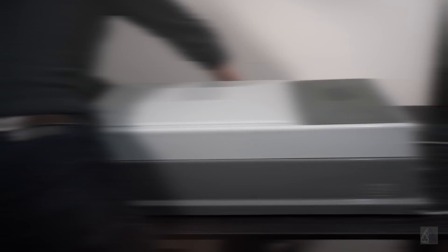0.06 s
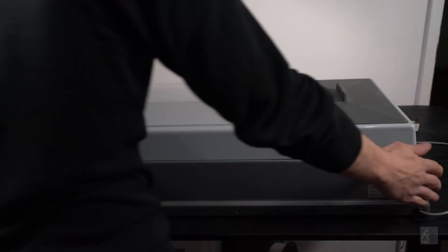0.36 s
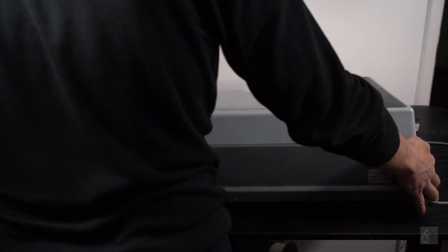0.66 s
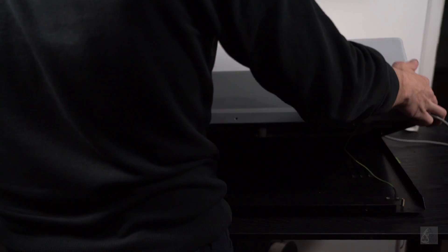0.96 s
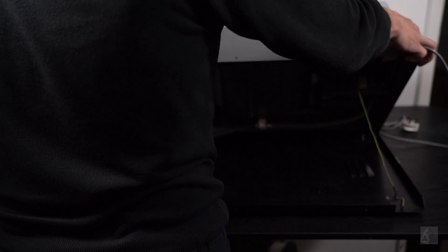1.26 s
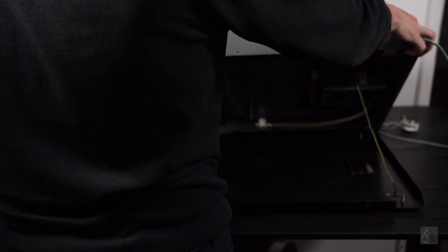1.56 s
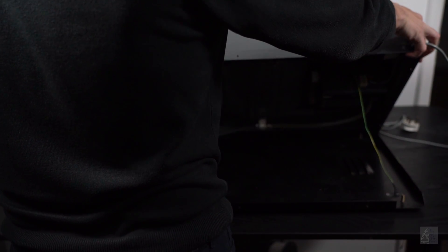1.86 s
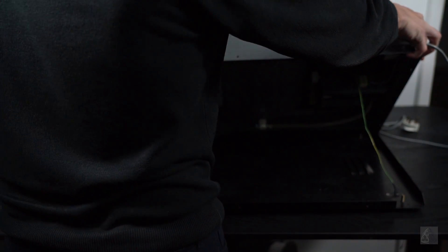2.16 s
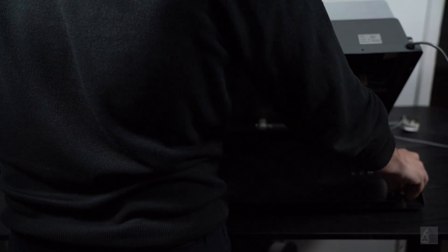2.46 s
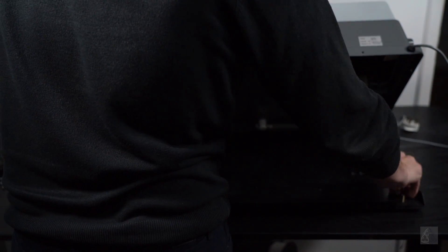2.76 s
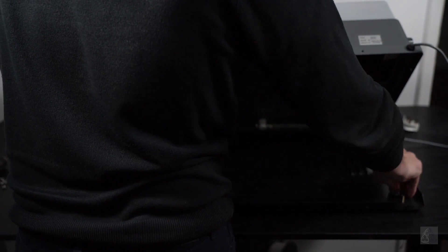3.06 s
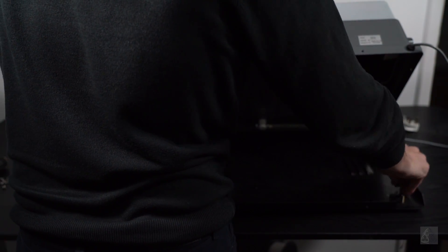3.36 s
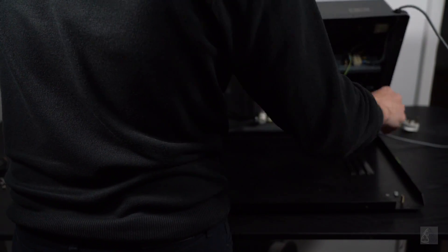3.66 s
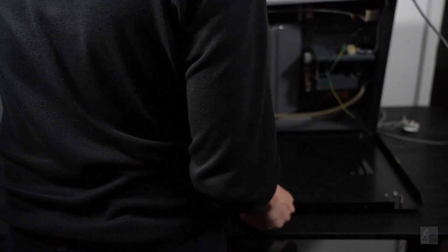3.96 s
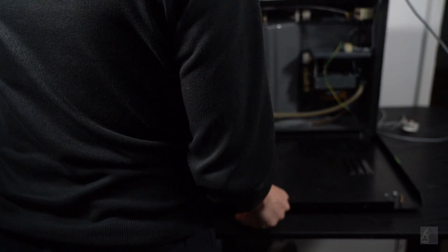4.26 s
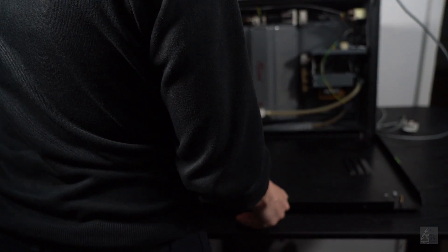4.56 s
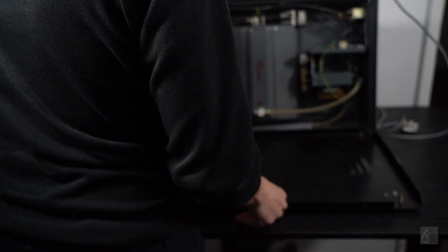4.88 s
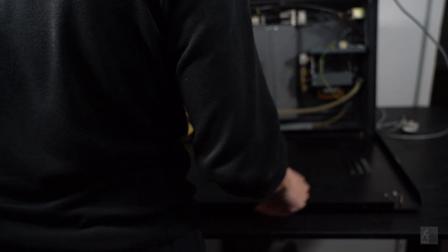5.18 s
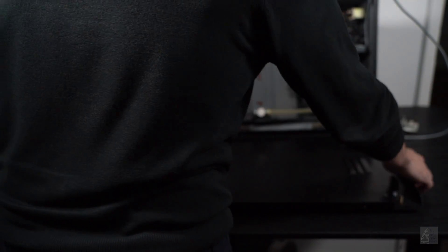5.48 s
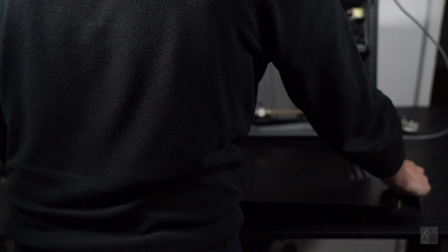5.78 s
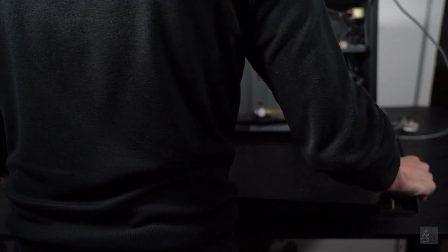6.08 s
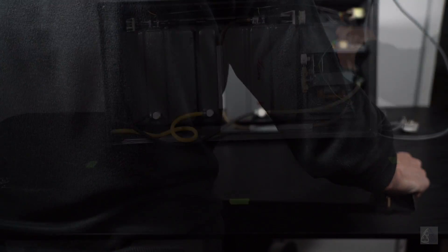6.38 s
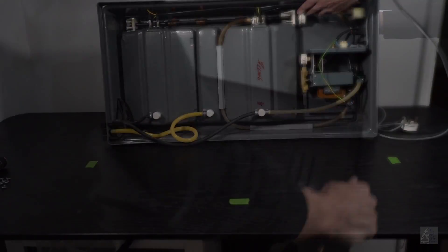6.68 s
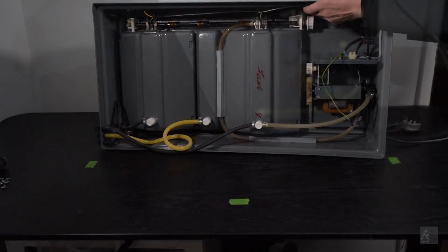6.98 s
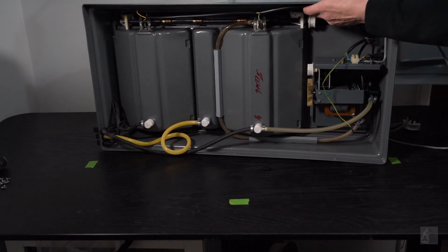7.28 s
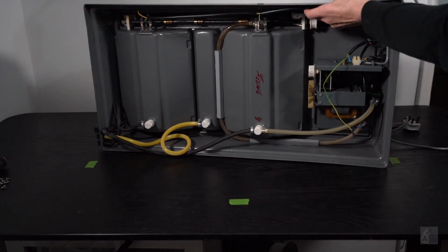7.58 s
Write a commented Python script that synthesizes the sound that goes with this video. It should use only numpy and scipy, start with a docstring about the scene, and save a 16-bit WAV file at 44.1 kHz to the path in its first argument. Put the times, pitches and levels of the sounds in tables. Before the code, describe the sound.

Hands and sleeves brush a machine's plastic housing, which gives a few hollow knocks and light clicks as it is lifted. About halfway through, it clatters loudly and judders briefly on its loose base panel. Softer knocks and rubs follow, then a second quick cluster of loud knocks as it rocks to rest on a table. It is heard in stereo in a small room with faint hiss.

```python
"""Over a faint room tone, hands and sleeves brush a machine's plastic housing; then it knocks and flexes
as it is lifted and stood on edge on a table. It clatters and judders on its loose base panel, a fitting
snaps, and it rocks to rest. Blows excite the damped modes of the shell, sliding friction drives its crowded
resonances as noise, and flexed parts ring when let go. A microphone pair hears it in a small room."""
import sys
import numpy as np
from scipy import signal
from scipy.fft import rfft, irfft, next_fast_len
from scipy.io import wavfile
from scipy.ndimage import uniform_filter1d

SR = 44100
rng = np.random.default_rng(int(sys.argv[2]) if len(sys.argv) > 2 else 0)


def file_out(sig):
    """Save sig as 16-bit WAV at sys.argv[1]."""
    # one column per channel
    cols = np.atleast_2d(sig).T
    # limit, then scale
    lim = np.clip(cols, -1, 1)
    pcm = np.round(lim * 32767).astype(np.int16)
    wavfile.write(sys.argv[1], SR, pcm)


N = 340893

# room murmur and hiss: (frequency [Hz], relative spectral density [dB])
ROOM_SPECTRUM = [(15, -51), (25, -6), (204, 2.5), (260, -3.5), (445, -3.5), (523, -3), (631, -7), (997, -8),
                 (1380, -10), (2630, -13), (9550, -18), (14300, -19.5), (15500, -18.5)]
# likeness of the two channels: (frequency [Hz], correlation [ratio])
COHERENCE = [(60, .99), (300, .96), (600, .87), (900, .68), (1400, .42), (2800, .1), (10000, .12)]
# stereo balance: (frequency [Hz], left minus right [dB])
BALANCE = [(250, 0.06), (1000, 1.5), (2000, 0.3), (4000, 1), (8000, -1.7), (12000, 0)]
# main modes of the housing and its panel: (frequency [Hz], relative level [dB], t60 [s])
SHELL_MODES = [(128, -13, .3), (180, -10, .14), (227, -6, .16), (302, -6, .2), (366, -8, .14),
               (431, -7, .16), (515, -6, .13), (560, -7, .12), (943, -6, .16), (1008, -9, .12),
               (1207, -8, .17), (1435, -10, .13), (1519, -5, .18), (1731, -8, .14), (1816, -6, .18),
               (2036, -10, .15), (2148, -9, .15), (2242, -8, .16), (2352, -10, .15), (2546, -10, .12),
               (3250, -13, .09), (4414, -14, .1), (4678, -12, .1), (9700, -13, .05)]
# decay of the shell's dense, overlapping modes: (frequency [Hz], base t60 [s])
SHELL_DECAY = [(90, 0.25), (230, 0.08), (700, 0.09), (2100, 0.094), (7500, 0.065)]
# the hold tightens and loosens, changing that decay: (time [s], t60 multiplier [ratio])
GRIP_RING_LENGTH = [(.6, 1.2), (4.15, 1.4), (4.35, 1.25), (4.44, .9), (4.53, 1.4), (4.73, .9), (5.5, 1.3),
                    (6.82, 1.05), (6.89, 1.5)]
# centres of the table thump, shell boom, knock, crack, tick and sizzle zones: (frequency [Hz])
ZONES_HZ = [90, 230, 700, 2100, 5500, 12000]
# spectral weighting added to every contact: (frequency [Hz], gain [dB])
CONTACT_COLOUR = [(25, -25.5), (50, -8), (100, -7), (150, 3), (230, -1), (420, -1), (800, -2), (1300, 0),
                  (2000, -1), (3200, -1), (5000, -2), (7200, 0.5), (9500, 8), (16000, -11.5)]
# hands, sleeves and edges sliding; boom and crack are relative to the drive in the knock zone:
# (time [s], duration [s], drive [dB], boom [dB], crack [dB], tilt above the crack [dB/octave])
RUBS = [(0.06, 0.044, -50, -6, -0.5, 6.5), (0.072, .11, -56.5, -9, -0.5, 4.5),
        (0.201, 0.23, -63.5, -12, 4.5, -3), (0.339, 0.09, -51, -10, -5.5, -8.5),
        (0.432, 0.15, -49, -6, -3, -5.5), (0.638, 0.074, -53.5, 12, -15, -1),
        (1.301, 0.1, -58.5, 6, 0.5, -3), (1.391, 0.1, -46.5, 6, -9, -4), (1.49, 0.079, -48, 4.5, 5.5, -8.5),
        (3.973, .075, -51.5, 8, -3.5, -3.5), (4.111, 0.14, -38, 0, 4, -6.5),
        (4.468, 0.042, -43, -5, -15, -6), (4.602, 0.1, -58.5, 2, -12, -10.5),
        (5.395, .14, -64, -10, 14.5, -8), (5.595, 0.082, -54, 0, 3, -3.5), (5.691, 0.12, -57, -2, -1.5, -7),
        (6.074, 0.2, -64.5, 12, 4.5, -4.5), (6.716, 0.091, -43.5, -1, -6, -4),
        (6.969, 0.13, -52, -7, 0, -6.5), (7.39, 0.092, -52.5, 1, -3, -11),
        (7.654, 0.054, -60, -12, 3.5, -2.5)]
# walls springing back and parts left ringing: (time [s], frequency [Hz], level [dB], t60 [s])
FREE_RINGS = [(.876, 2730, -24.5, 0.026), (.876, 2133, -26.5, .04), (.877, 3500, -34, 0.033),
              (.878, 1103, -25.5, .074), (.880, 207, -0.5, 0.064), (1.439, 556, -20.5, 0.044),
              (1.469, 77, -30, 0.12), (1.965, 207, -40.5, 0.15), (2.282, 2620, -43, 0.035),
              (2.286, 365, -43, 0.08), (3.895, 1208, -45.5, 0.23), (3.894, 1820, -49, 0.2),
              (3.893, 2147, -41.5, .092), (4.156, 544, -23, 0.24), (4.158, 221.7, -16.5, 0.32),
              (4.26, 1754, -19.5, 0.11), (4.281, 302, -25.5, 0.13), (4.331, 1006, -23.5, 0.24),
              (4.4, 2095, -32, .18), (4.537, 428.6, -24.5, 0.19), (4.539, 248, -19, 0.092),
              (5.815, 3550, -39.5, .045), (6.771, 570, -13.5, 0.031), (7.155, 953, -47, .21)]
# impacts on the housing; thump, boom and crack are relative to the drive in the knock zone:
# (time [s], build-up [s], drive [dB], thump [dB], boom [dB], crack [dB], tilt above the crack [dB/octave])
BLOWS = [ (0.204, 0.00087, -52.5, -25, -7, -7.5, -1.5), (0.551, 0.0011, -42.5, -4, -8, -8.5, -6.5),
         (0.621, 0.0069, -31.5, -17, 0, -7.5, -6), (0.875, 0.0032, -30.5, -4, 7.5, 0.5, -12),
         (0.935, 0.0032, -40.5, -24, 10.5, -11, -14), (1.005, 0.0011, -51, -11, 12.5, 0.5, -13),
         (1.151, 0.003, -60, -3, 13.5, -7, -3), (1.184, 0.0067, -62, 5, 14, 5.5, -2),
         (1.268, 0.01, -42, -12, 4.5, -5.5, -5), (1.435, 0.0018, -41, -9, 6.5, -1, -28),
         (1.57, 0.0079, -45, -6, 0, -5.5, -1.5), (1.668, 0.014, -51.5, -18, 0, -4, 4),
         (1.764, 0.004, -43.5, -20, 1.5, -5.5, -6), (1.84, 0.012, -46, -26, 4.5, -18, 0),
         (1.960, 0.014, -47.5, -16, -4, -5.5, -3), (2.164, 0.0091, -50.5, -6, -1.5, -2.5, -4.7),
         (2.277, 0.0032, -49, -12, 12.5, 3, -10), (2.451, 0.0092, -44, 5, 7.5, -10, -2.5),
         (2.493, .003, -55.5, -11, -5, 0, -5.5), (2.578, 0.0028, -68, 2, -5, 7, -2.5),
         (2.698, 0.0022, -58.5, -9, 10.5, -0.5, -13), (2.896, .003, -55, -11, -4, -9, -13),
         (2.936, 0.011, -51.5, -9, 4, 0, -3.5), (3.117, 0.0045, -62, 5, 12, 4.5, -3),
         (3.383, 0.0083, -45, 6.5, 1.5, 1.5, -2), (3.669, 0.0066, -47, -8, 0.5, -9, -11),
         (3.742, 0.0096, -50, -8, 3, -7, 0), (3.889, 0.0077, -51, 1, -3, 7, -13),
         (4.043, .012, -42.5, 15, 12.5, -7, -13), (4.060, 0.0029, -33, -14, 13.5, -12, -4.5),
         (4.122, 0.0067, -25, -17.5, 1, -14, -13), (4.149, .003, -15, -16, -8, -9.5, -2),
         (4.167, 0.0011, -28, -23, 17.5, 2, -6), (4.185, 0.0013, -22.5, -16, -5, 0, -9),
         (4.213, .001, -30, -40, 1.5, 1.5, -5.5), (4.227, 0.0017, -25, -38, -12, 8, -4),
         (4.326, 0.0059, -22.5, -18, -6.5, 7, -6.5), (4.356, .0026, -32, -32.5, -15, 0.5, -3.5),
         (4.403, .001, -31.5, -24, -18, 3, -9.5), (4.432, 0.0035, -29.5, -27, -17, 3.5, -13),
         (4.519, 0.006, -45, -10.5, -19, 5, -9), (4.534, 0.0027, -15.5, -22, -5.5, -13, -9),
         (4.732, 0.0012, -35, 1, 7.5, -2.5, -4), (4.761, 0.0007, -25.5, -15, -1, -12.5, -14),
         (5.023, .001, -72, -7, -8, 6, 1), (5.146, 0.0054, -60.5, -8, 0, 8.5, -13),
         (5.444, 0.0072, -47.5, -6, 3, 0, -7), (5.592, .005, -50, -18, 5.5, -2.5, -4.5),
         (5.664, 0.0046, -44.5, -8, 7.5, -14, -9), (5.742, 0.002, -37, -9.5, -2, -14, -7.5),
         (5.814, 0.002, -37.5, -11, 9.5, -2.5, -16.5), (5.949, 0.0026, -36, -1.5, -0.5, 6, -0.5),
         (6.079, 0.0035, -42.5, -34, 2.5, -14.5, -3.5), (6.140, 0.0055, -50, -10, 6, 0, -21),
         (6.255, 0.0018, -46, 2.5, 2.5, -14, -10), (6.354, 0.0073, -60, 12, 8.5, -2.5, -8),
         (6.559, 0.0057, -58.5, -17, -23, 5.5, -6), (6.769, 0.0078, -29.5, -12, 9, -10, -1.5),
         (6.809, 0.0018, -21, -11, -.5, -12.5, -12.5), (6.839, 0.009, -19, -29, 2.5, -9, -4.5),
         (6.881, 0.0025, -21, -36, 1.5, -0.5, -13.5), (6.893, 0.0083, -21.5, -10, 4.5, -3, -11.5),
         (6.932, 0.0058, -37, -19, 17, -8, -5.5), (7.05, 0.0011, -51, -1, 6, -0.5, -7),
         (7.152, 0.026, -43.5, -14, 13.5, -4, -13), (7.191, .003, -47.5, -18, -11, 1, -17),
         (7.567, 0.0065, -57.5, -6, 7.5, -0.5, -3), (7.687, 0.0011, -46.5, -18, -11, 2.5, -12.5)]

BANDS_HZ = 31.25 * 2 ** (np.arange(19) / 2)
TOP_HZ = 15850
RING_SAMPLES, NOISE_SAMPLES = 12000, 65536
T = np.arange(RING_SAMPLES) / SR  # time since a contact, s


def undb(db):
    """Amplitude grows tenfold for every 20 dB."""
    return 10 ** (np.asarray(db) / 20)


def at(hz, points):
    """Interpolation of (frequency, value) points on a logarithmic frequency axis."""
    f, value = np.transpose(points)
    return np.interp(np.log(np.maximum(hz, 1)), np.log(f), value)


def add(out, s, sound):
    """Superposition: a sound starting at time s adds to those already present."""
    i = max(int(s * SR), 0)
    out[:, i:i + sound.shape[1]] += sound[:, :max(N - i, 0)]


def stereo(hz, mid, side):
    """Spatial coherence: the channels agree in the bass and part in the treble, where reflections dominate."""
    alike = np.clip(at(hz, COHERENCE), 0, 1)
    lean = undb(at(hz, BALANCE) / 2)
    mid, side = mid * np.sqrt((1 + alike) / 2), side * np.sqrt((1 - alike) / 2)
    return np.array([(mid + side) * lean, (mid - side) / lean])


def room_tone(level_db=-61.52):
    """Stationary noise: a low room murmur under even microphone hiss."""
    size = next_fast_len(N)
    hz = np.fft.rfftfreq(size, 1 / SR)
    white = stereo(hz, *rfft(rng.standard_normal((2, size))))
    noise = irfft(white * undb(at(hz, ROOM_SPECTRUM)) * (hz < TOP_HZ), size)[:, :N]
    return noise / np.std(noise.mean(axis=0)) * undb(level_db)


def dense_modes(peak_db=12, half_width_hz=16):
    """Modal overlap: crowded resonances act as noise, peaked at the main modes; (band, channel, time)."""
    hz = np.maximum(np.fft.rfftfreq(NOISE_SAMPLES, 1 / SR), 1)
    resonances = (undb(peak_db + db) / (1 + ((hz - f) / half_width_hz) ** 2) for f, db, _ in SHELL_MODES)
    peaks = np.sqrt(1 + sum(resonance ** 2 for resonance in resonances))
    bands = []
    for centre in BANDS_HZ:
        spectrum = stereo(hz, *rfft(rng.standard_normal((2, NOISE_SAMPLES)))) * peaks
        window = np.cos(np.pi / 2 * np.clip(2 * np.log2(hz / centre), -1, 1))
        band = irfft(spectrum * window, NOISE_SAMPLES)
        bands.append(band / np.std(band))
    return np.array(bands, dtype=np.float32)


def stretch(bands, count):
    """Random phase: each contact takes its own stretch of the crowded resonances."""
    start = int(rng.random() * (NOISE_SAMPLES // 2))
    return bands[:, :, start:start + count]


def treble(crack_db, tilt_db):
    """Contact hardness sets the slope per octave: crack, tick and sizzle in dB, duller when soft."""
    octaves = np.log2(np.array(ZONES_HZ[3:]) / ZONES_HZ[3])
    return crack_db + tilt_db * octaves + np.array([-0.5, -0.5, -4.5])  # thin plastic loses the very top


def excitation(hz, db, thump, boom, crack, tick, sizzle):
    """Excitation spectrum: how strongly a contact drives half an octave around each frequency."""
    zone_db = np.interp(np.log(hz), np.log(ZONES_HZ), [thump, boom, 0, crack, tick, sizzle])
    return undb(db + zone_db + at(hz, CONTACT_COLOUR)) / np.sqrt(2)


def chatter(count, spread_db, step=24):
    """Uneven contact: the force, of unit rms, jumps at random every step samples."""
    force = np.repeat(undb(spread_db * rng.standard_normal(count // step + 1)), step)[:count]
    return force / np.sqrt(np.mean(force ** 2))


def mix(shell, gain, grain):
    """Amplitude modulation: the bands are summed, and the contact's grain roughens only the treble."""
    bright = BANDS_HZ > 900
    low, high = (np.einsum("b,bct->ct", np.float32(gain * part), shell) for part in (~bright, bright))
    return low + high * grain


def finger_taps(count=48, per_s=4, build_s=0.00484, drive_db=-73, thump_db=-11.5, boom_db=13.5):
    """Light impacts: contacts of shifting fingers, random in time, strength and hardness."""
    starts = (np.arange(count) + rng.random(count)) / per_s
    return [(s, build_s, drive_db - 1.5 * weak, thump_db, boom_db, *treble(crack_db=6, tilt_db=hard - 0.5))
            for s, (weak, hard) in zip(starts, rng.standard_normal((count, 2))) if s < N / SR]


def rubs(bands, grain_db=3, catch_db=1.7, gain_db=-2.0):
    """Sliding friction: the pressure swells, catches and fades, driving the shell with a fine grain."""
    out = np.zeros((2, N))
    for s, length, db, boom, crack, tilt in RUBS:
        thump = boom - 8  # sliding shakes the table less than the shell
        gain = excitation(BANDS_HZ, db, thump, boom, *treble(crack, tilt))
        count = int(length * SR)
        catches = uniform_filter1d(chatter(NOISE_SAMPLES, catch_db, step=500), size=200)[:count]
        pressure = np.sqrt(np.sin(np.pi * np.arange(count) / count)) * catches
        add(out, s, pressure * mix(stretch(bands, count), gain, chatter(NOISE_SAMPLES, grain_db)[:count]))
    return undb(gain_db) * out


def flexed_parts():
    """Free vibration: a flexed part lets go and rings at one frequency, decaying exponentially."""
    out = np.zeros((2, N))
    for s, hz, db, t60 in FREE_RINGS:
        swell_s = 0.00037 + 1 / hz  # a moment plus one cycle
        envelope = undb(db - 60 * T / t60) * (1 - np.exp(-(T / swell_s) ** 2))
        ring = envelope * np.exp(2j * np.pi * hz * T)
        add(out, s, stereo(hz, ring, 1j * ring).imag)
    return out


def judder(count=12, start_s=4.243, slips_per_s=56, build_s=0.0014, surge_s=0.098, surge_db=2):
    """Stick-slip on the base panel: uneven, surging contacts, weaker and duller as the sliding slows."""
    late, strong = rng.standard_normal((count, 2)).T
    ages = (np.arange(count) + 0.16 * late) / slips_per_s
    surge = surge_db * np.cos(2 * np.pi * ages / surge_s)
    drives_db = -28 - 29 * ages + surge + strong
    sizzles_db = -22.5 - 101 * ages
    thump_db, boom_db, crack_db, tick_db = -15.5, -9.5, 0.5, 2.5  # the panel's edge is bright
    return [(start_s + age, build_s, db, thump_db, boom_db, crack_db, tick_db, sizzle_db)
            for age, db, sizzle_db in zip(ages, drives_db, sizzles_db)]


def handling():
    """Impulsive forcing: the contacts of gripping, lifting and setting down."""
    return [(*blow, *treble(crack, tilt)) for *blow, crack, tilt in BLOWS]


def knocks(bands, contacts, dense_db=0.4, modes_db=-7.5, room_db=-36, room_t60_s=0.35):
    """Impact response: a blow builds as the surfaces meet, then decays in the shell's modes and the room."""
    out = np.zeros((2, N))
    free_s = np.maximum(T - 0.007, 0)  # reflections from table and wall sustain the first moments
    damping = np.float32(np.log(1000) * free_s / at(BANDS_HZ, SHELL_DECAY)[:, None])
    room = np.float32(undb(room_db) * np.exp(-np.log(1000) * T / room_t60_s))
    direct = 1 + 0.34 * np.exp(-T / 0.0035)  # the direct crack comes first
    bending = 1 - np.exp(-T * BANDS_HZ[:, None] / 0.29)  # bending waves need part of a cycle to build
    attack = np.float32(direct * bending)
    mode_hz, mode_db, t60 = np.transpose(SHELL_MODES)
    rings = np.exp((2j * np.pi * mode_hz - np.log(1000) / t60)[:, None] * T).astype(np.complex64)
    for s, build_s, *colour in contacts:
        ring_length = np.interp(s, *np.transpose(GRIP_RING_LENGTH))  # a firm grip shortens the ring
        swell = np.float32(1 - np.exp(-T / build_s))
        envelope = swell * attack * (np.exp(-damping / np.float32(ring_length)) + room)
        shell = stretch(bands, RING_SAMPLES) * envelope[:, None]
        # the blow sets the energy in each band, whatever the phases
        energy = np.einsum("bct,bct->b", shell, shell)
        gain = np.sqrt(2 * np.sum(envelope ** 2, axis=1) / energy) * excitation(BANDS_HZ, *colour)
        # every contact point favours other bands and modes
        gain *= undb(0.27 * rng.standard_normal(len(BANDS_HZ)))
        chance = rng.standard_normal((len(SHELL_MODES), 3)).T
        coupling = stereo(mode_hz, *np.exp(2j * np.pi * chance[:2])) * undb(mode_db + 3 * chance[2])
        hollow_ring = (np.complex64(coupling * excitation(mode_hz, *colour)) @ rings).imag * swell
        dense_ring = mix(shell, gain, chatter(RING_SAMPLES, spread_db=2))
        add(out, s, undb(dense_db) * dense_ring + undb(modes_db) * hollow_ring)
    return out


def scene():
    """Superposition: rubs, blows, judder and taps share one shell, with ringing parts and room tone."""
    bands = dense_modes()
    background = room_tone() + rubs(bands) + flexed_parts()
    return background + knocks(bands, handling() + judder() + finger_taps())


def record(dry):
    """Band limiting: a steep low-pass filter cuts the top of the treble."""
    return signal.sosfilt(signal.ellip(10, .2, 80, TOP_HZ, fs=SR, output="sos"), dry)


dry = scene()
out = record(dry)
file_out(out)
```